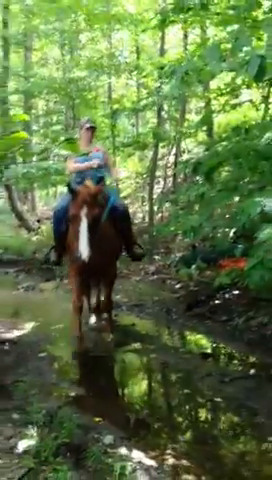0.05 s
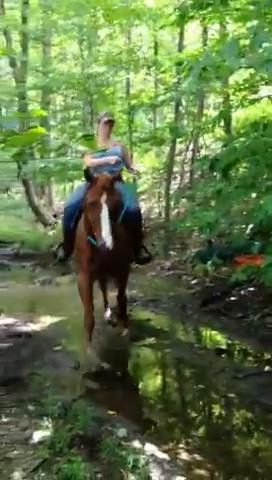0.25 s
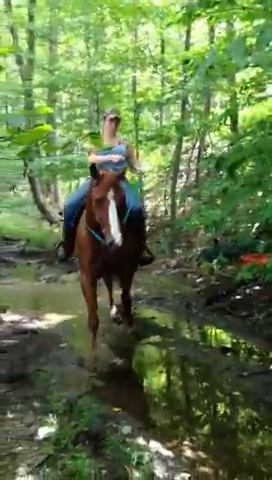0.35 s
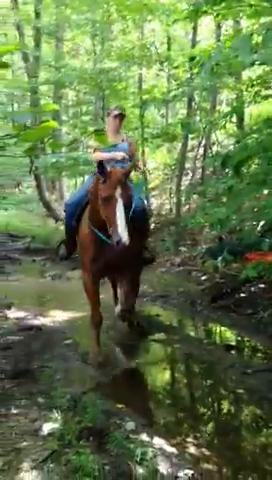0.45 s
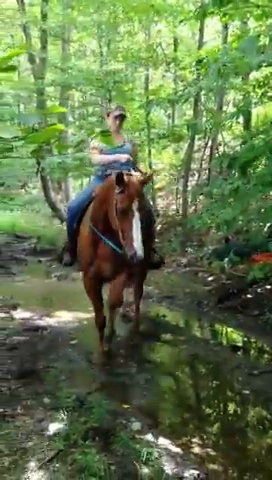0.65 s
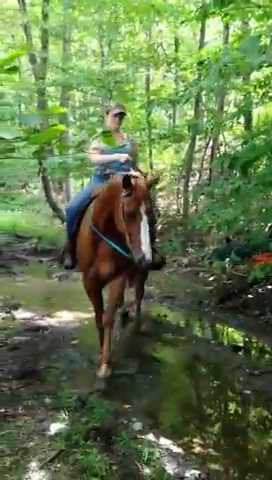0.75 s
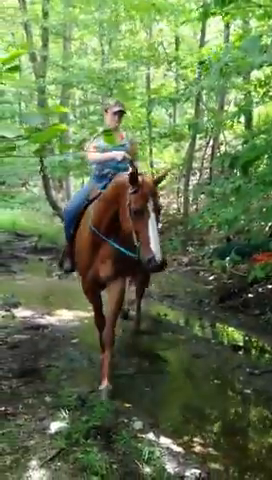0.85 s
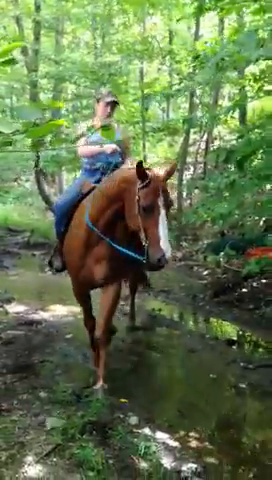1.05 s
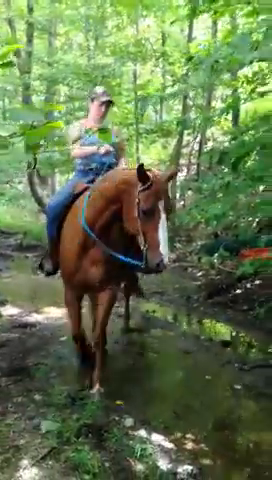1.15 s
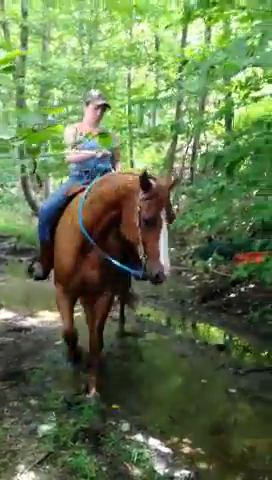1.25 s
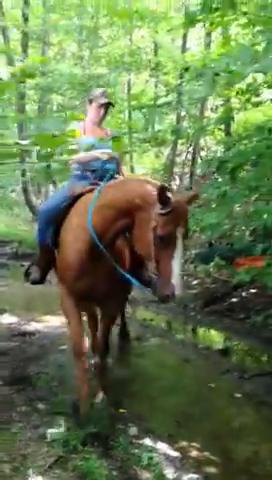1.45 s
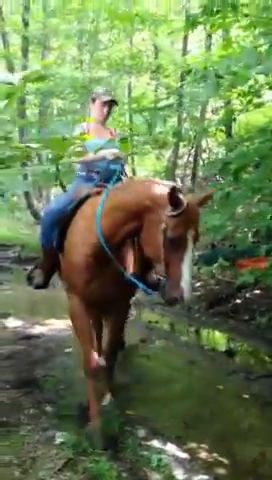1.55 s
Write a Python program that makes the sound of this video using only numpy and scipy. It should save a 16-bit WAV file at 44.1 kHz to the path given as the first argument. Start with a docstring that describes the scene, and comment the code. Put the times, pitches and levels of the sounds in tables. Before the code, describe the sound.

A horse's hooves splash through a shallow muddy puddle. A light slap opens, then a sharp splash with a plop comes at about 0.2 seconds and another at 0.5. Smaller splashes follow around 0.7 to 1.0, then stronger plopping ones at 1.1 and 1.2. Drops patter and bubble back between steps and on to 1.5 seconds, with a faint echo over a soft, steady forest hush.

```python
"""Forest trail: a horse walks through a shallow muddy puddle.
Each hoof slaps the water (a crackle over a thud); damped, gliding sines add plops, thumps and a clack.
Spray from steps and lifted legs patters back as clicks and small ringing bubbles.
The trees return a faint echo over a soft forest hush."""
import sys
import numpy as np
from scipy import signal
from scipy.fft import rfft, irfft
from scipy.io import wavfile

SR = 44100
rng = np.random.default_rng(int(sys.argv[2]) if len(sys.argv) > 2 else 0)


def bounce(signal):
    """Save signal as a 16-bit WAV file at the path given by the first command-line argument."""
    frames = np.transpose(np.atleast_2d(signal))
    limited = np.clip(frames, -1, 1)
    pcm = np.round(limited * 32767).astype(np.int16)
    wavfile.write(sys.argv[1], SR, pcm)


N = 70560
TIME_S = np.arange(N) / SR
BIN_HZ = np.maximum(np.arange(N + 1) * SR / (2 * N), 1)

# Band centres in Hz: thud, body, middle, crack or patter, top or fizz.
BANDS_HZ = [250, 700, 1500, 4500, 12000]

# Hooves and thrown water hit the puddle. Each row: start in seconds, hold in seconds,
# then thud, body, middle, crack and top levels in dB per kHz.
HOOF_SLAPS = [ (0.0103, 0.0098, -49.5, -49.5, -43.5, -61, -78),
              (0.2071, 0.0031, -57, -33.5, -35.5, -35, -46), (0.2116, 0.0014, -43, -37, -38.5, -26, -42),
              (0.2166, 0.0048, -47, -65, -56, -42.5, -44), (0.254, 0.0013, -38, -48, -37, -52, -70),
              (0.33, 0.0021, -43, -55, -74, -53.5, -61), (0.472, 0.02, -71, -70, -56, -56, -60.5),
              (0.5014, .0005, -68, -65, -57, -53, -43), (0.5037, 0.0078, -45.5, -37, -44.5, -43.5, -70),
              (0.558, 0.00069, -62, -77, -64, -49, -69), (0.741, .002, -43, -41, -50, -64, -66),
              (0.8741, 0.00049, -56, -42, -53, -44.5, -53), (0.877, .001, -47, -50, -46, -82, -73),
              (0.953, 0.0037, -48.5, -48, -46.5, -56, -69), (1.045, .002, -55, -47, -59, -47, -75),
              (1.113, 0.0071, -62, -51, -40.5, -61, -82), (1.125, 0.0018, -45, -48, -39, -69, -78),
              (1.1867, 0.0012, -41, -37, -35, -47, -58), (1.204, 0.0038, -55, -32, -49, -51, -83),
              (1.2093, 0.0024, -69, -45, -40, -47.5, -73), (1.409, .012, -55.5, -69, -52, -58, -74),
              (1.432, 0.0015, -63, -60, -53, -52, -59)]
SLAP_ATTACK_S, SLAP_DECAY_S, THUD_ATTACK_S, THUD_DECAY_S = .0002, .0018, .00086, .003
SLAP_LOW_HZ, THUD_TOP_HZ, BODY_TOP_HZ = 136, 421, 2230

# Water plops, low hoof thumps and a sharp clack. Each row: start in seconds, pitch in Hz,
# glide in octaves per second, peak in dB, decay in seconds.
PLOPS_AND_KNOCKS = [ (0.2085, 794, 2, -32, .0045), (0.2095, 583, 2, -33.5, .005),
                    (0.255, 600, -3, -35, 0.0028), (0.3815, 287, -92, -35.5, 0.0077),
                    (0.381, 2460, -9, -38, 0.0018), (0.4069, 310, -3, -39.5, 0.0026),
                    (0.434, 726, 24, -42.5, 0.0044), (0.446, 743, 3, -40.5, 0.0038),
                    (0.507, 236, -20, -40.5, 0.0058), (0.579, 700, 24, -40, 0.0062),
                    (0.590, 585, 10, -43, .006), (0.876, 1153, 1, -38.5, 0.0043),
                    (0.877, 310, -6, -37.5, 0.0033), (0.909, 655, -7, -44, .004),
                    (1.022, 560, 3, -43, 0.0057), (1.1119, 1440, -26, -36, .006),
                    (1.1225, 741, 2.5, -27, 0.0044), (1.122, 240, -14, -44, 0.0075),
                    (1.144, 740, -2, -39, 0.013), (1.159, 1370, 10, -43, .003),
                    (1.1872, 623, -2, -26.5, 0.0026), (1.1883, 1320, 4, -28, .0008),
                    (1.189, 223, -9, -38, 0.0067), (1.352, 750, 7, -41.5, 0.0028),
                    (1.493, 765, 13, -44.5, 0.005)]

# Falling spray. Each row: start in seconds, rise in seconds, decay in seconds, bubble level in dB,
# then middle, patter and fizz levels in dB per kHz.
SPRAY_FALLS = [ (0.005, 0.034, 0.018, -53, -56, -61.5, -66.5),
               (0.212, 0.014, 0.058, -58, -51, -46.5, -54.5), (0.370, 0.036, 0.18, -57, -61, -62.5, -72),
               (0.503, 0.0083, 0.1, -48, -49, -51, -57), (0.714, 0.019, 0.093, -59.5, -61.5, -59, -64),
               (0.872, 0.014, 0.11, -58, -76, -61.5, -62), (0.960, 0.025, 0.03, -65, -61, -53.5, -67),
               (1.018, 0.024, 0.29, -57, -61.5, -57.5, -63.5), (1.120, 0.0062, 0.067, -48.5, -48, -64, -68),
               (1.186, 0.012, 0.049, -44.5, -48, -50, -57), (1.270, 0.023, 0.063, -59, -68, -80, -84),
               (1.404, 0.036, 0.27, -57, -56.5, -61, -64.5)]
SPRAY_LOW_DB, SPRAY_BODY_DB = -13.5, -2.5  # relative to the middle band

# Small bubbles. Each row: pitch in Hz, relative level in dB.
BUBBLE_SPECTRUM = [(450, -22), (600, -11), (740, -3), (950, -3), (1150, 2.5), (1380, 6), (1700, -9.5),
                   (2800, 6.5)]
BUBBLES_PER_S, BUBBLE_T60_CYCLES = 1500, 14

# Tree echo. Each row: frequency in Hz, gain in dB.
ECHO_SPECTRUM = [(200, -16), (1000, -8.5), (5000, -17.5), (14000, -16)]
ECHO_GAP_S, ECHO_T60_S = .011, 1

# Forest hush. Each row: frequency in Hz, level in dB per kHz.
HUSH_SPECTRUM = [(30, -85), (60, -77), (100, -66.5), (170, -59), (280, -55), (450, -57), (700, -59),
                 (1500, -63), (4500, -67), (8000, -67.5), (10000, -71.5), (15000, -75)]

# Microphone peaks and dips. Each row: centre in Hz, width in Hz, gain in dB.
MIC_BANDS = [(4060, 340, 2.5), (4635, 57, 6), (4760, 120, 5), (7540, 1700, 3), (9740, 1500, -3),
             (464, 274, -3), (955, 224, -5)]
WATER_LOW_HZ, CUTOFF_HZ = 114, 15150


def hoof_slaps():
    """The surface bursts in a brief dense crackle over a dull thud in the mud."""
    out = np.zeros(N)
    for start_s, hold_s, *levels_db in HOOF_SLAPS:
        crackle = coloured(clicks(per_s=9000, spread_db=-1), list(zip(BANDS_HZ, levels_db)))
        thud_shape = envelope(start_s, THUD_ATTACK_S, hold_s, THUD_DECAY_S)
        slap_shape = envelope(start_s, SLAP_ATTACK_S, hold_s, SLAP_DECAY_S)
        thud = burst(butter(crackle, THUD_TOP_HZ, "low", order=4), thud_shape)
        body = burst(butter(crackle, [THUD_TOP_HZ, BODY_TOP_HZ], "band"), slap_shape)
        crack = burst(butter(crackle, BODY_TOP_HZ, "high", order=4), slap_shape)
        out += butter(thud + body + crack, SLAP_LOW_HZ, "high")
    return out


def plops_and_knocks():
    """Short damped, gliding tones: water plops, low hoof thumps and a sharp clack."""
    out = np.zeros(N)
    for start_s, pitch_hz, octaves_per_s, peak_db, decay_s in PLOPS_AND_KNOCKS:
        glide_s = np.clip(TIME_S - start_s, 0, .03)
        hz = pitch_hz * 2 ** (octaves_per_s * glide_s)
        phase = 2 * np.pi * np.cumsum(hz * (TIME_S >= start_s)) / SR
        shape = envelope(start_s, rise_s=.00072, hold_s=.00042, decay_s=decay_s)
        out += from_db(peak_db) * np.sin(phase) * shape
    return out


def spray():
    """Droplets patter back on the puddle and stir up bubbles, swelling and dying away."""
    out, gurgle = np.zeros(N), bubbles()
    for start_s, rise_s, decay_s, bubble_db, middle_db, patter_db, fizz_db in SPRAY_FALLS:
        levels_db = [middle_db + SPRAY_LOW_DB, middle_db + SPRAY_BODY_DB, middle_db, patter_db, fizz_db]
        patter = coloured(clicks(per_s=7800, spread_db=.5), list(zip(BANDS_HZ, levels_db)))
        out += (patter + from_db(bubble_db) * gurgle) * envelope(start_s, rise_s, 0, decay_s)
    return out


def bubbles(pitches=28):
    """Small bubbles ring as damped resonators struck at random; steady stream, unit rms."""
    out = np.zeros(N)
    for hz in np.geomspace(BUBBLE_SPECTRUM[0][0], BUBBLE_SPECTRUM[-1][0], pitches):
        radius = from_db(-60 * hz / (BUBBLE_T60_CYCLES * SR))
        angle_rad = 2 * np.pi * hz / SR
        births = clicks(BUBBLES_PER_S / pitches, spread_db=3.3) + 1e-18
        ring = signal.lfilter([0, np.sin(angle_rad)], [1, -2 * radius * np.cos(angle_rad), radius ** 2],
                              births)
        out += gain_at(BUBBLE_SPECTRUM, hz) * ring
    return unit_rms(out)


def tree_echo(sound):
    """Trunks and leaves scatter a weak, dull echo."""
    shape = envelope(ECHO_GAP_S, rise_s=ECHO_GAP_S, hold_s=0, decay_s=ECHO_T60_S / np.log(1000))
    tail = clicks(per_s=3000, spread_db=3) * shape
    response = rfft(tail / np.linalg.norm(tail), 2 * N) * gain_at(ECHO_SPECTRUM, BIN_HZ)
    return irfft(rfft(sound, 2 * N) * response)[:N]


def forest_hush():
    """Soft steady noise, strongest in the low mids."""
    return coloured(rng.standard_normal(N), HUSH_SPECTRUM)


def clicks(per_s, spread_db):
    """Random impulses of uneven size and sign."""
    sizes = from_db(spread_db * np.minimum(rng.exponential(1, N), 5))
    return sizes * rng.choice([-1, 1], N) * (rng.random(N) < per_s / SR)


def envelope(start_s, rise_s, hold_s, decay_s):
    """Linear rise, hold, exponential decay."""
    age_s = TIME_S - start_s
    return np.clip(age_s / rise_s, 0, 1) * np.exp(-np.maximum(age_s - rise_s - hold_s, 0) / decay_s)


def burst(sound, shape):
    """Envelope a steady sound, scaled to the expected energy."""
    shaped = sound * shape
    expected_energy = np.mean(sound ** 2) * np.sum(shape ** 2)
    return shaped * np.sqrt(expected_energy / (np.sum(shaped ** 2) + 1e-30))


def coloured(white, spectrum):
    """Shape a white signal to a spectrum in dB per kHz."""
    bins = rfft(unit_rms(white), 2 * N) * gain_at(spectrum, BIN_HZ)
    nyquist_khz = SR / 2000
    return irfft(bins)[:N] * np.sqrt(nyquist_khz)


def butter(x, hz, kind, order=2):
    """Causal Butterworth filter."""
    return signal.sosfilt(signal.butter(order, hz, kind, fs=SR, output="sos"), x + 1e-18)


def gain_at(spectrum, hz):
    """Gain from (Hz, dB) points, interpolated over log frequency."""
    points_hz, points_db = np.transpose(spectrum)
    return from_db(np.interp(np.log(hz), np.log(points_hz), points_db))


def from_db(db):
    """Decibels to gain."""
    return 10 ** (np.asarray(db) / 20)


def unit_rms(x):
    """Scale to rms 1."""
    return x / np.sqrt(np.mean(x ** 2) + 1e-20)


def scene():
    """Steps in the water, their echo and the forest; mono."""
    water = butter(hoof_slaps() + plops_and_knocks() + spray(), WATER_LOW_HZ, "high", order=4)
    return (water + tree_echo(water) + forest_hush())[None]


def record(dry):
    """A small microphone adds peaks and dips; a steep low-pass cuts the top."""
    for hz, width_hz, gain_db in MIC_BANDS:
        band = signal.lfilter(*signal.iirpeak(hz, hz / width_hz, fs=SR), dry)
        dry = dry + (from_db(gain_db) - 1) * band
    return signal.sosfilt(signal.ellip(12, .2, 70, CUTOFF_HZ, fs=SR, output="sos"), dry)


dry = scene()
out = record(dry)
bounce(out)
```